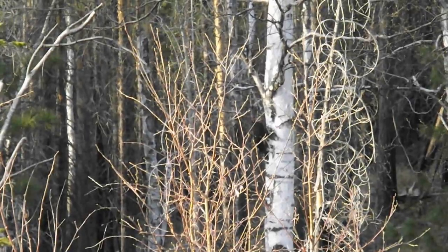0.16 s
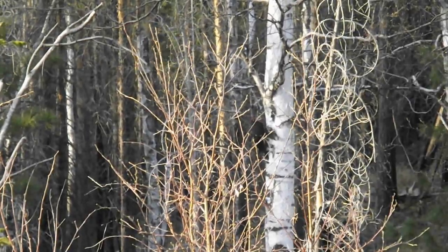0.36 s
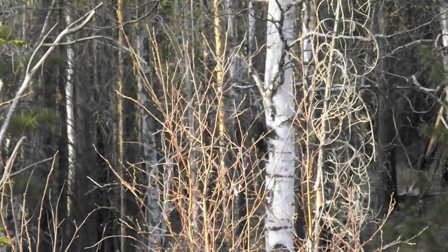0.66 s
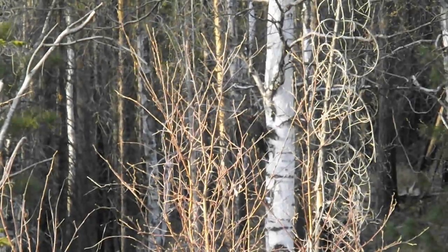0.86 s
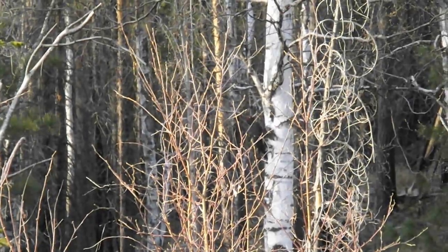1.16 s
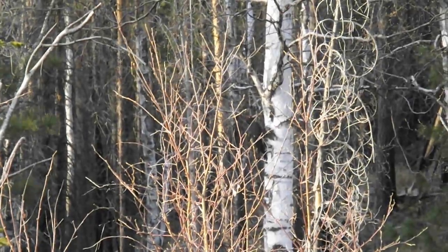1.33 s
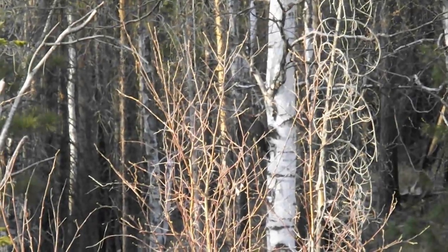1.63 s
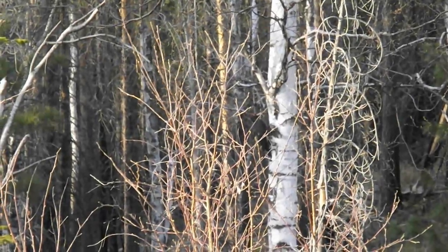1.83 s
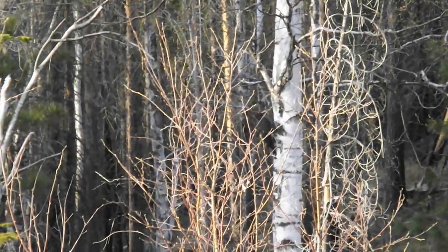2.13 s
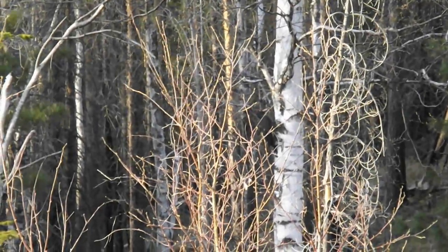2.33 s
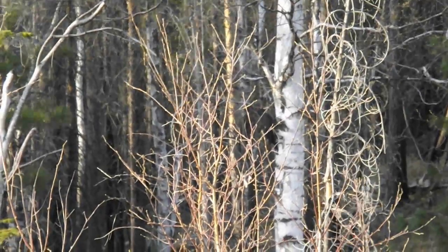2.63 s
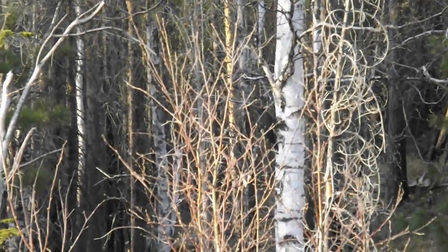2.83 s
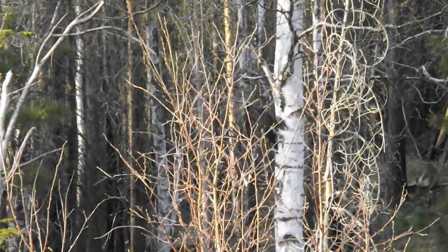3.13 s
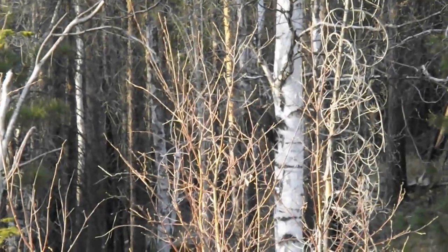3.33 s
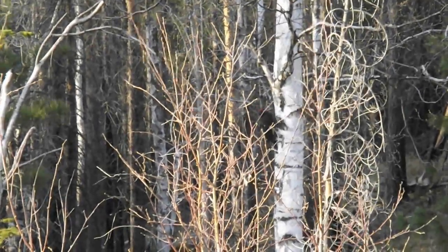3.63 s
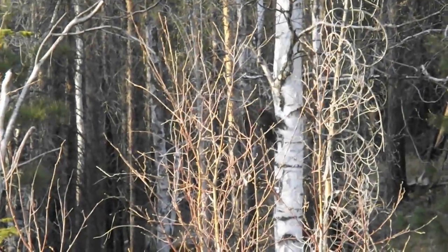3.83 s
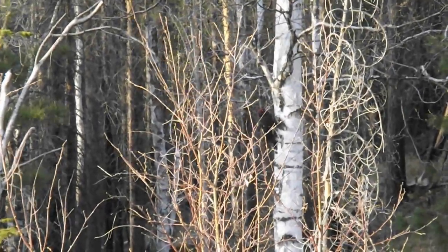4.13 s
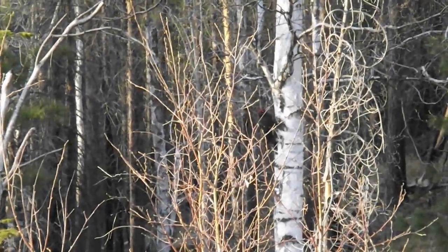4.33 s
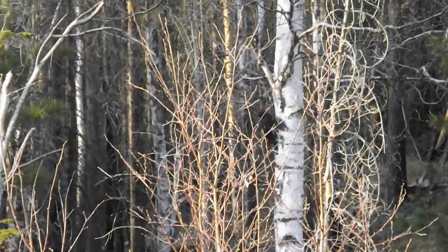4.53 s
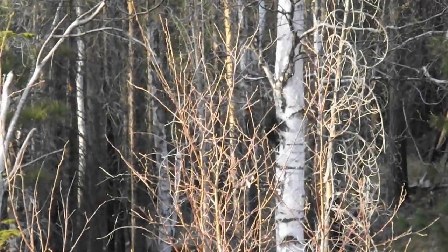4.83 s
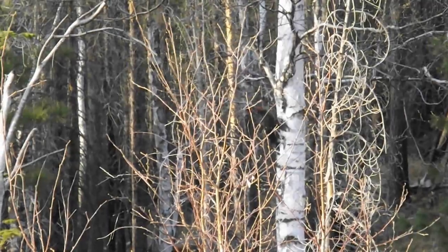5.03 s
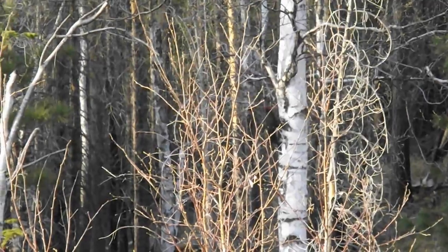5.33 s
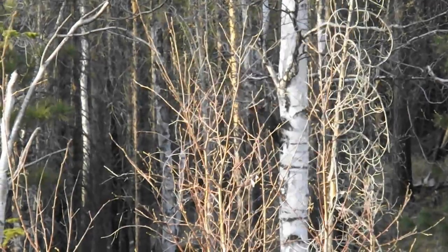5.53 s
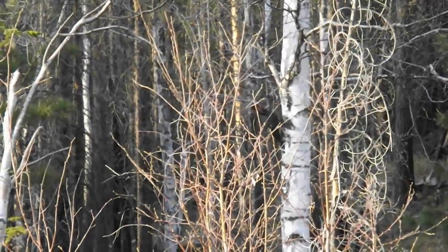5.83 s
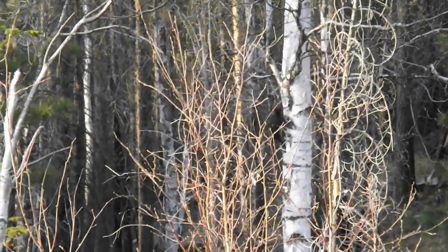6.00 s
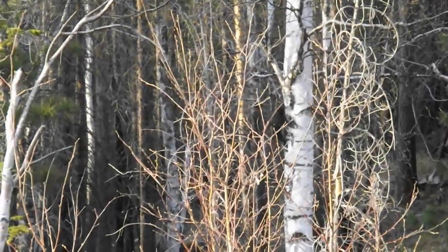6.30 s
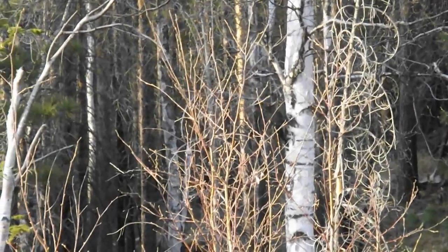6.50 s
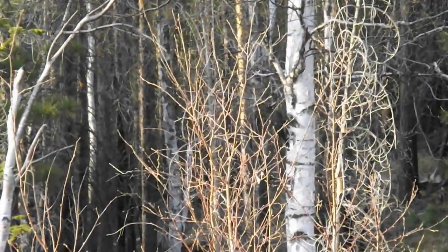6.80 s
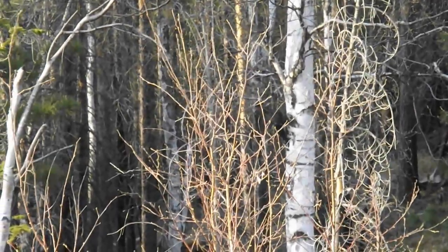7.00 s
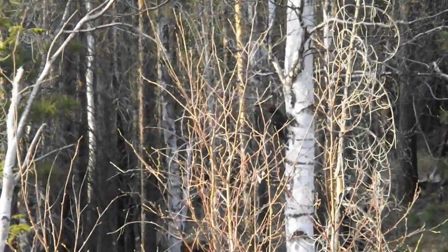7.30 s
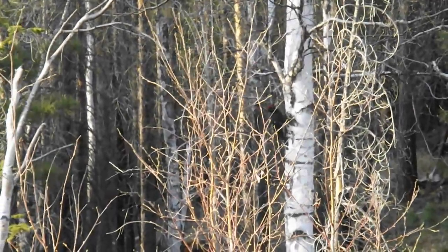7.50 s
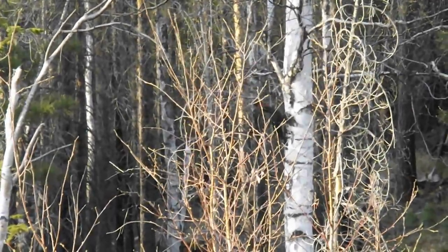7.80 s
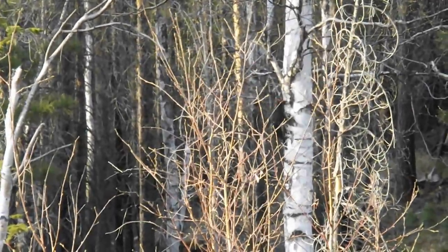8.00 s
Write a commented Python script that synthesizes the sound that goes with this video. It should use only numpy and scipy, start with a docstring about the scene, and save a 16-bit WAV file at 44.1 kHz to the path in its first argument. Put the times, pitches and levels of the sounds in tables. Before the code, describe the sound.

Steady forest hush with very deep wind rumble and barely audible rapid ticking from the camera. A small bird whistles faintly, falling in pitch, as a nearby woodpecker yelps sharply and holds a long level whistle. Four soft wing puffs pass, then the woodpecker calls again with a light echo from the trunks. Later the small bird sings four more notes, growing stronger, and a twig ticks.

```python
"""A steady forest hush under light wind rumble and very faint camera ticks; a small bird whistles over it, falling.
A woodpecker calls twice: a sharp yelp that breaks upward, then a long, level whistle. Four soft wing beats pass,
the small bird sings again and a twig ticks. Tones are swept sines; hush, wind, camera, rasps and twig are
shaped noise; wing beats are blurred resonances; sparse decaying echoes from the trunks follow birds and twig."""
import sys
import numpy as np
from scipy import signal
from scipy.fft import rfft, irfft
from scipy.io import wavfile

SR = 44100
rng = np.random.default_rng(int(sys.argv[2]) if len(sys.argv) > 2 else 0)


def dump_mix(stems):
    """Bounce the given channels to the path in sys.argv[1] as a 16-bit WAV at rate SR."""
    frames = np.atleast_2d(stems).T  # one column per channel
    limited = np.clip(frames, -1, 1)  # hard clip at full scale
    pcm = np.round(limited * 32767).astype(np.int16)
    wavfile.write(sys.argv[1], SR, pcm)


N = 359415
TIME = np.arange(N) / SR
# the yelp, shared by call pitch and voice: its half length and that of the register break at its top
YELP_HALF_S, BREAK_HALF_S = 0.026, 0.0108 / 2


def amp(db):
    """Decibels to gain."""
    return 10 ** (np.asarray(db) / 20)


def evened(x):
    """Scales to an rms of one."""
    return x / np.sqrt(np.mean(x ** 2) + 1e-20)


def read(points, hz):
    """Interpolates a spectrum table on a log-frequency axis."""
    point_hz, value = np.transpose(points)
    return np.interp(np.log(hz + 1), np.log(point_hz + 1), value)


def add(mix, start_s, sound):
    """Mixes a sound in at start_s."""
    part = mix[max(round(start_s * SR), 0):][:len(sound)]
    part += sound[:len(part)]


def sequence(events, source):
    """Sounds a source once per table row: start_s, then the arguments of the source."""
    track = np.zeros(N)
    for start_s, *shape in events:
        add(track, start_s, source(*shape))
    return track


def coloured(gain, size):
    """Noise of unit rms whose spectrum follows gain(Hz)."""
    spectrum = rfft(rng.standard_normal(size))
    return evened(irfft(spectrum * gain(np.fft.rfftfreq(size, 1 / SR)), size))


def waver(corner_hz, size):
    """Slow random drift of unit rms: noise rolled off above corner_hz."""
    return coloured(lambda f: 1 / (1 + (f / corner_hz) ** 4), size)


def bump(t, half_length, order=2):
    """Smooth swell of height one around t = 0; a higher order gives a flatter top."""
    return np.exp(-np.abs(t / half_length) ** order)


def burst(level_db, centre_hz, half_width_hz, decay_s):
    """Tiny dry noise burst around one pitch, decaying exponentially."""
    t = np.arange(4096) / SR
    noise = coloured(lambda f: 1 / (1 + ((f - centre_hz) / half_width_hz) ** 2), size=len(t))
    return amp(level_db) * np.exp(-t / decay_s) * noise


def hush(level_db=-49.5, swell_db=0.33):
    """Even background noise with a few narrow resonances; level_db is the rms above 300 Hz."""
    # spectral shape: hz, relative_level_db
    hush_shape = [(20, 22.5), (60, 17), (120, 10), (250, 6), (500, 0.5), (780, -3), (1800, 0), (2600, -1),
                  (3350, 0.5), (3650, -8.5), (4100, -6), (4800, -13), (6000, -14), (15500, -21.5)]
    # narrow resonances that the hush rings in: centre_hz, width_hz, rise_db
    rings = [(898, 96, 4), (1155, 67, 7.5), (1410, 69, 8.5), (2839, 207, 11)]
    f = np.fft.rfftfreq(N, 1 / SR)
    rise_db = sum(db / (1 + (2 * (f - hz) / width) ** 2) for hz, width, db in rings)
    gain = amp(read(hush_shape, f) + rise_db)
    above_bass = np.sqrt(np.sum(gain[f > 300] ** 2) / np.sum(gain ** 2))
    return amp(level_db + swell_db * waver(2.4, size=N)) * coloured(lambda _: gain, size=N) / above_bass


def wind(breeze_db=-45.5, drift_db=2, corner_hz=17, slope=3.06, buffet_db=-19, buffet_hz=55):
    """Breeze and gusts push on the microphone as very deep rumble; the strongest break into quicker eddies."""
    # gusts: peak_s, level_db, half_length_s
    gusts = [(.85, -31.5, 0.074), (3.132, -31.5, 0.082), (4.16, -28.5, 0.1), (5.52, -28.5, 0.068),
             (5.78, -35, 0.055), (6.053, -36.5, 0.11), (7.15, -46, 0.23), (7.836, -21.5, 0.057),
             (8.06, -30, 0.12)]
    gust = amp(breeze_db + drift_db * waver(1.25, size=N))
    gust = gust + sum(amp(db) * bump(TIME - peak_s, half_s) for peak_s, db, half_s in gusts)
    rumble = coloured(lambda f: f / (f + 6) / (1 + (f / corner_hz) ** slope), size=N)
    eddies = coloured(lambda f: f / (1 + (f / buffet_hz) ** 4), size=N)
    return gust * (rumble + amp(buffet_db) * np.sqrt(gust / gust.max()) * eddies)


def camera(level_db=-56.5, corner_hz=4200, half_length_s=0.0012):
    """Faint, even train of thin treble noise ticks from the camera."""
    ticks_per_s, first_tick_s = 29.496, 0.0144
    ticks = bump(TIME % (1 / ticks_per_s) - first_tick_s, half_length_s, order=4)
    hiss = coloured(lambda f: f ** 2 / (f ** 2 + corner_hz ** 2) / (f + corner_hz), size=N)
    return amp(level_db) * ticks * hiss


def whistle(level_db, length_s, fade_db_per_s):
    """Small bird's pure tone: swells, slides from a high to a low note while sagging, stops short."""
    high_hz, low_hz, sag_hz_per_s = 4740, 3675, 1050  # both notes before the sag
    slide_at_s, slide_s, attack_s = 0.081, 0.0125, 0.065
    jitter_share, shimmer_db = 0.0028, 1.1  # rms unsteadiness of pitch and level
    t = np.arange(0, length_s, 1 / SR)
    unsteady = waver(70, size=len(t))
    slide = 1 / (1 + np.exp((t - slide_at_s) / slide_s))
    hz = low_hz + (high_hz - low_hz) * slide - sag_hz_per_s * t
    hz = hz * (1 + jitter_share * unsteady)
    loud = amp(level_db + fade_db_per_s * t + shimmer_db * unsteady) * np.minimum(t / attack_s, 1) ** 1.6
    tone = np.sin(2 * np.pi * np.cumsum(hz) / SR)
    return np.sqrt(2) * loud * tone * signal.windows.tukey(len(t), 0.06)


def small_bird():
    """Falling whistles, each a single sliding sine."""
    # whistles: start_s, level_db (before fade and attack), length_s, fade_db_per_s
    whistles = [(0.158, -58, .2, -45), (0.55, -58, .2, -8), (0.939, -59.5, 0.16, -12),
                (6.359, -61.5, 0.27, 35), (6.737, -51, 0.285, 5), (7.121, -41.5, 0.24, -31),
                (7.486, -43, 0.26, -32)]
    return sequence(whistles, whistle)


def call_pitch(t, yelp_s, crest_s, held_hz, scoop_hz, lift_hz):
    """Scoop up into the yelp and its register break, a long flat arch, a final drop."""
    arch_hz, arch_s, arch_power = 53, 0.28, 2.5  # arch_hz below the crest at arch_s either side
    scoop_s, drop_hz, drop_s = 0.0098, 253, 0.01466
    break_hz, dip_hz, dip_s = 1665, 110, 0.0072
    lift_left = 0.72  # share of the lift that returns after the break
    arch = held_hz - arch_hz * np.abs((t - crest_s) / arch_s) ** arch_power
    lift = lift_hz * bump(t - yelp_s, YELP_HALF_S) * np.where(t < yelp_s, 1, lift_left)
    dip = dip_hz * bump(t - yelp_s, dip_s)
    scoop = scoop_hz * np.exp((t[0] - t) / scoop_s)
    drop = drop_hz * np.exp((t - t[-1]) / drop_s)
    hz = arch + lift - dip - scoop - drop
    return hz + (break_hz - hz) * bump(t - yelp_s, BREAK_HALF_S, order=4)


def woodpecker(start_s, yelp_s, crest_s, brightest_s, end_s, held_hz, scoop_hz, lift_hz, push_db, octave_push_db,
               lead_db, break_octave_db, third_db, upper_db,
               jitter_share=0.0014, shimmer_db=0.5, flutter_db=2.0, strain_db=7.0):
    """Clean harmonic voice, octave dominant; surges and breaks upward in the yelp, holds, then drops."""
    # windpipe resonances that colour the overtones: hz, level_db
    windpipe = [(4500, -18), (5300, -25), (5900, -39), (6300, -23), (6700, -27), (7350, -19), (8250, -24),
                (8800, -43), (9900, -26), (10400, -31), (11500, -46)]
    # the octave cracks out as the voice catches or changes register: peak_s, level_db, half_length_s
    cracks = [(.247, -18, .0024), (.2705, -11, .0013), (.2843, -8, .002), (.301, -25, .006),
              (3.690, -25, .002)]
    fundamental_db, octave_db = -39.5, -30.5  # held note
    attack_drop_db, attack_s, release_drop_db, release_s = -23, 0.0061, -28.5, 0.018
    break_db, break_third_db = 4.5, 4.5
    lead_third_db, third_push_db, brighten_db, brighten_s = -5.5, 2, 3.5, 0.14
    t = np.arange(start_s, end_s, 1 / SR)
    hz = call_pitch(t, yelp_s, crest_s, held_hz, scoop_hz, lift_hz)
    hz = hz * (1 + jitter_share * waver(120, size=len(t)))

    surge = bump(t - yelp_s, YELP_HALF_S)
    broken = bump(t - yelp_s, BREAK_HALF_S, order=6)
    lead_in = np.clip((yelp_s - t) / BREAK_HALF_S - 1, 0, 1)  # one before the break, then zero
    attack_db = attack_drop_db * np.exp((start_s - t) / attack_s)
    release_db = release_drop_db * np.exp((t - end_s) / release_s)

    low_db = fundamental_db + attack_db + release_db + push_db * surge + break_db * broken
    second_db = octave_db + release_db + octave_push_db * surge + lead_db * lead_in
    octave = amp(second_db + broken * (break_octave_db - second_db))
    octave = octave + sum(amp(db) * bump(t - peak_s, half_s) for peak_s, db, half_s in cracks)
    # overtones: held back until the yelp, surge with it, swell once more in the held note
    over_db = (third_db + attack_db / 2 + release_db + lead_third_db * lead_in + third_push_db * surge
               + break_third_db * broken + brighten_db * bump(t - brightest_s, brighten_s))

    phase = 2 * np.pi * np.cumsum(hz) / SR
    voice = amp(low_db) * np.sin(phase) + octave * np.sin(2 * phase) + amp(over_db) * np.sin(3 * phase)
    for k in range(4, 11):
        # short waves of the high partials flutter on their way through the branches
        level_db = over_db + upper_db + read(windpipe, k * hz) + flutter_db * waver(33, size=len(t))
        # the strained yelp is brighter, the more so the higher the partial
        level_db = level_db + strain_db * surge * np.log2(k / 2)
        voice += amp(level_db) * np.sin(k * phase)
    return np.sqrt(2) * voice * amp(shimmer_db * waver(60, size=len(t)))


def woodpecker_calls():
    """Both calls, dry and as thrown at the trees; each excites its echo at its own level."""
    # calls: start_s, yelp_s, held-note crest_s, brightest_s, end_s, held pitch_hz, scoop_from_below_hz, yelp lift_hz,
    # fundamental push_db, octave push_db, octave before yelp_db, octave in break_db (absolute),
    # third_harmonic_db, upper_partials_db, echo_db
    cries = [(0.2441, .277, .60, 0.55, 0.816, 1466, 136, 120.2, 0.5, 12, -6.5, -14.5, -42.5, 1.5, -1),
             (3.646, 3.6821, 4.03, 3.77, 4.338, 1489, 29.8, 205, 7.5, 2, -13, -16.5, -43, -3, 1)]
    calls, thrown = np.zeros((2, N))
    for *shape, echo_db in cries:
        call = woodpecker(*shape)
        add(calls, shape[0], call)
        add(thrown, shape[0], amp(echo_db) * call)
    return calls, thrown


def voice_rasps():
    """The voice catches with short noise rasps as each call starts."""
    # rasps: start_s, level_db (at onset), centre_hz, half_width_hz, decay_s
    rasps = [(.2455, -45, 5000, 2200, 0.0045), (.269, -43, 4200, 2200, 0.019),
             (3.6465, -39, 3600, 1000, .005), (3.674, -46, 4400, 1500, .012)]
    return sequence(rasps, burst)


def forest(x, build_up_s=0.0032):
    """Sparse random reflections from the trunks, each band dying at its own speed."""
    # echo spectrum: hz, level_db
    echo_levels = [(500, -31), (1450, -13.5), (2500, -9.5), (2930, -13), (3300, -12.5), (3600, -6),
                   (4300, -16.5), (5000, -16), (7500, -13), (12000, -20)]
    # 60 dB decay time: hz, t60_s
    echo_decay = [(500, .8), (1450, 1.36), (2900, 0.74), (3400, 0.72), (10000, .35)]
    spacing = 20  # samples per reflection
    slots = np.arange(0, SR, spacing)
    taps = np.zeros(SR + spacing)
    taps[slots + rng.integers(0, spacing, len(slots))] = rng.standard_normal(len(slots))
    hz, t, bands = signal.stft(taps, SR, nperseg=256)
    t60 = read(echo_decay, hz)[:, None]
    energy = len(slots) * t60 / np.log(10 ** 6)
    bands = bands * np.exp(-np.log(1000) * t / t60) / np.sqrt(energy)
    bands = bands * amp(read(echo_levels, hz))[:, None] * (1 - np.exp(-t / build_up_s))
    tail = signal.istft(bands, SR, nperseg=256)[1]
    return signal.fftconvolve(x, tail)[:N]


def wing_beat(level_db, length_s, bright_db_per_octave, airy=0.6):
    """Short puff, quick to swell: a few hollow resonances, each blurred by the rushing air."""
    # hollow colour: hz, level_db (before brightness)
    beat_modes = [(298, 2), (525, -.5), (690, -8), (870, -8), (1130, -5), (1390, -2), (2060, -17),
                  (2355, -13)]
    t = np.arange(4096) / SR
    swell = (t / length_s) ** 2 * np.exp(-7 * t / length_s)
    body = np.zeros(len(t))
    for hz, db in beat_modes:
        blur = 1 + airy * (waver(106, size=len(t)) + 1j * waver(83, size=len(t)))
        ringing = np.exp(2j * np.pi * (hz * t + rng.random()))
        body += amp(db + bright_db_per_octave * np.log2(hz)) * (blur * ringing).real
    # same energy as level_db rms lasting length_s
    return amp(level_db) * evened(body * swell) * np.sqrt(length_s / t[-1])


def wing_beats():
    """Four soft puffs of air as wings pass."""
    # beats: start_s, level_db, length_s, brightness_db_per_octave
    beats = [(2.598, -43, 0.03, 1.5), (2.703, -44, 0.038, 1), (2.796, -40.5, 0.027, 2),
             (2.908, -46.5, 0.041, 0.5)]
    return sequence(beats, wing_beat)


def twig():
    """A twig ticks: one fast-decaying noise burst."""
    # ticks: start_s, level_db (at onset), centre_hz, half_width_hz, decay_s
    twig_ticks = [(8.103, -47.5, 4200, 800, .005)]
    return sequence(twig_ticks, burst)


def scene():
    """Birds and a twig among the trees, over hush, wind and camera ticks."""
    background = hush() + wind() + camera()
    song = small_bird()
    calls, thrown = woodpecker_calls()
    small = voice_rasps() + wing_beats() + twig()
    echoes = forest(thrown + 0.5 * song + small)
    return (calls + song + small + echoes + background)[None]


def record(dry, bend=0.08, edge_hz=15750):
    """Bends the loudest peaks slightly with a cubic, then low-passes at edge_hz."""
    bent = dry - bend * dry ** 3
    low_pass = signal.firwin(801, edge_hz, window=("kaiser", 9), fs=SR)
    return signal.oaconvolve(bent, low_pass[None], "same")


dry = scene()
out = record(dry)
dump_mix(out)
```